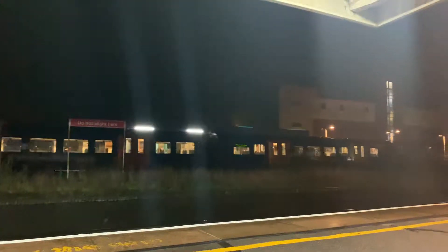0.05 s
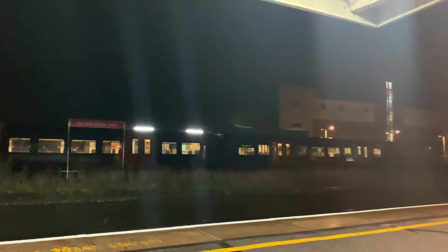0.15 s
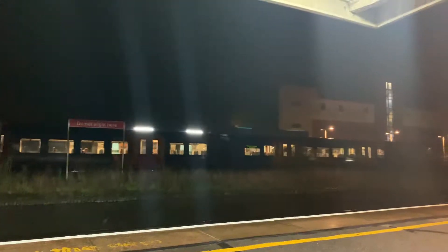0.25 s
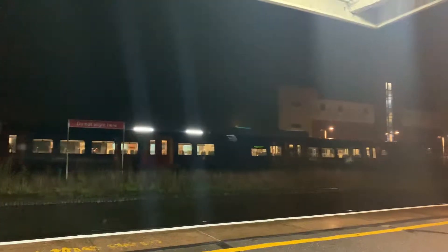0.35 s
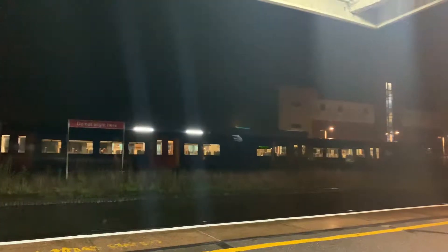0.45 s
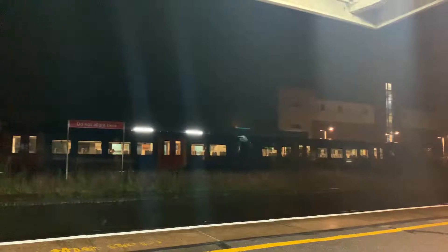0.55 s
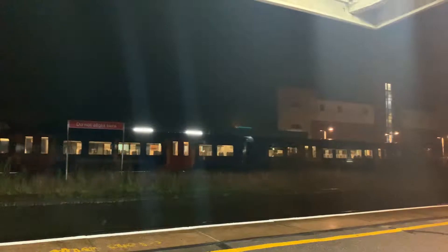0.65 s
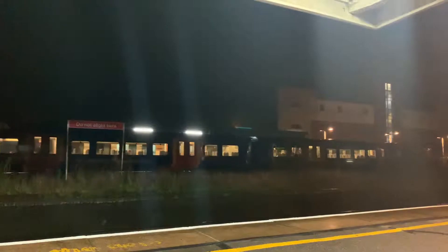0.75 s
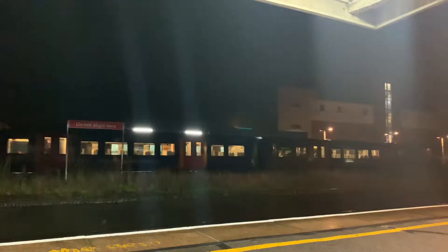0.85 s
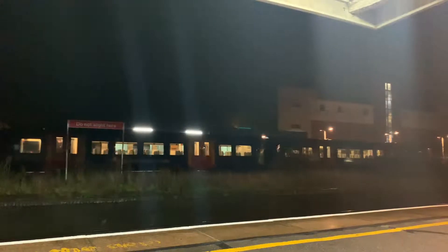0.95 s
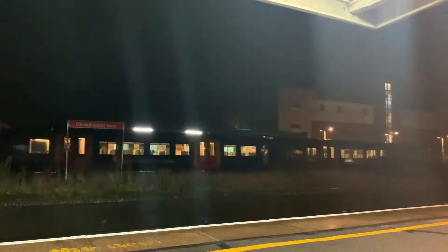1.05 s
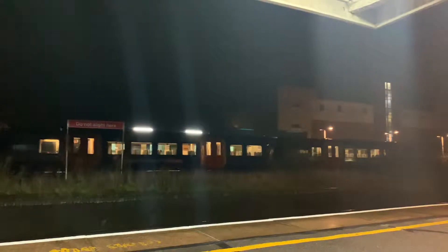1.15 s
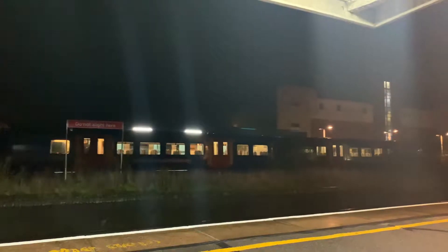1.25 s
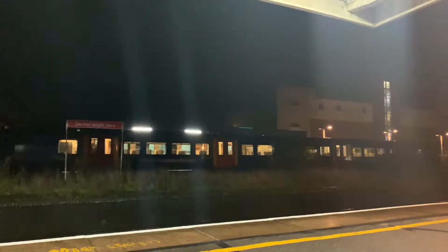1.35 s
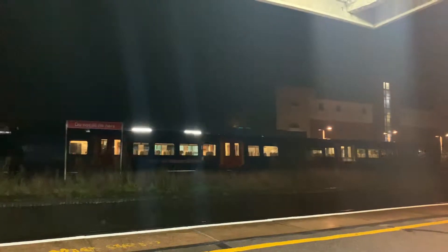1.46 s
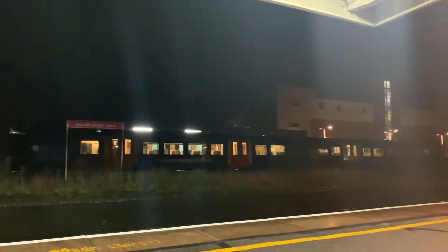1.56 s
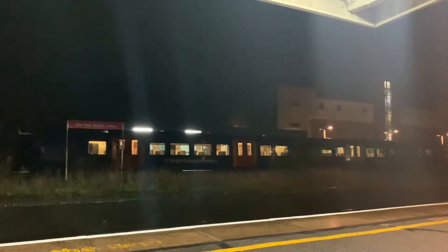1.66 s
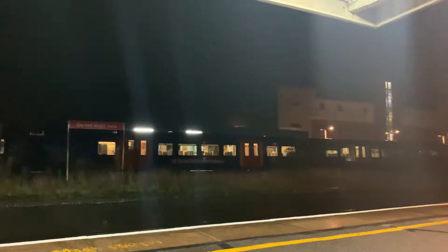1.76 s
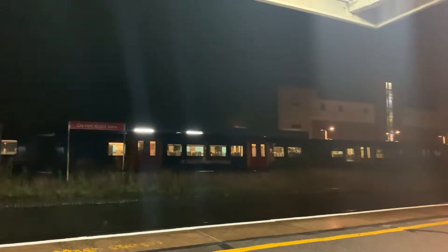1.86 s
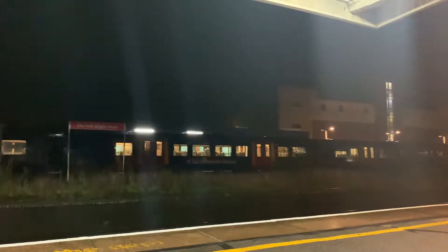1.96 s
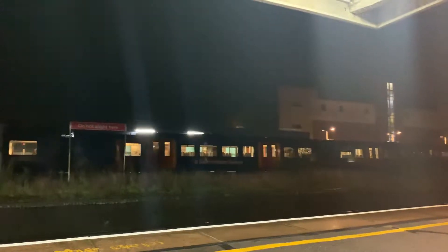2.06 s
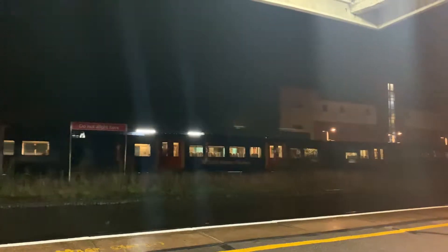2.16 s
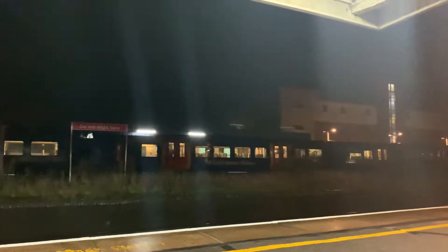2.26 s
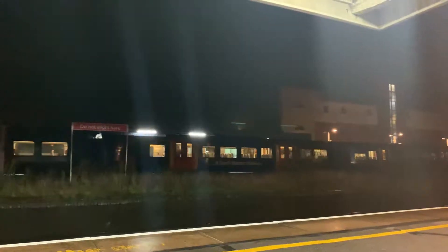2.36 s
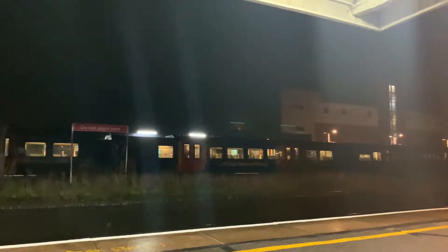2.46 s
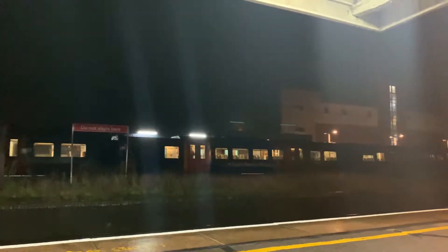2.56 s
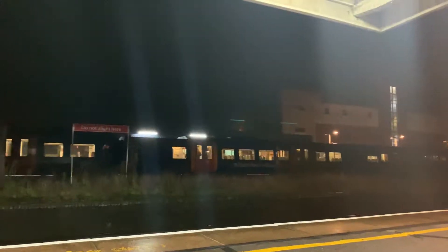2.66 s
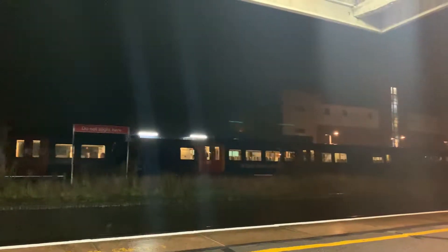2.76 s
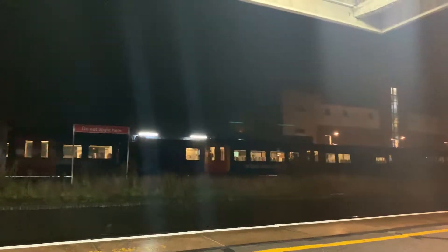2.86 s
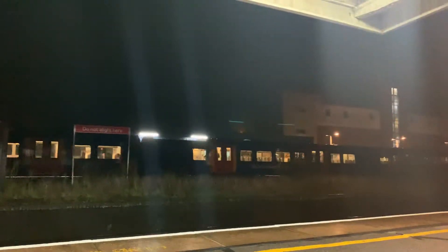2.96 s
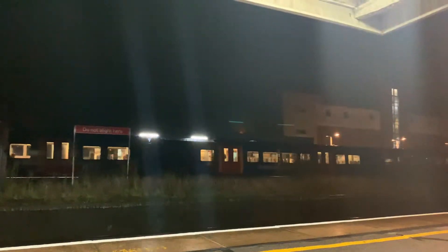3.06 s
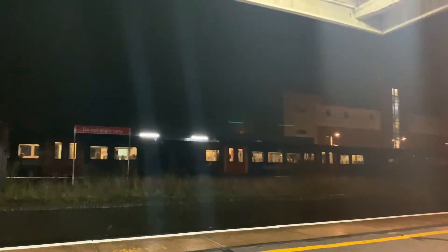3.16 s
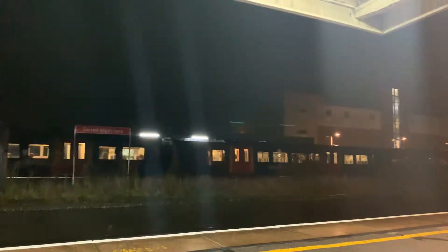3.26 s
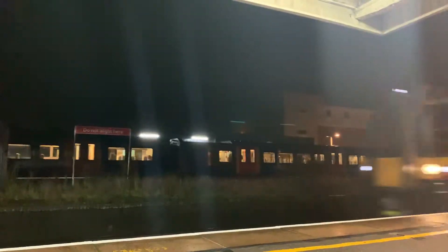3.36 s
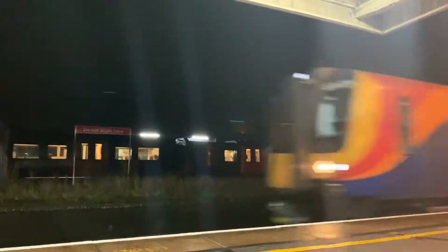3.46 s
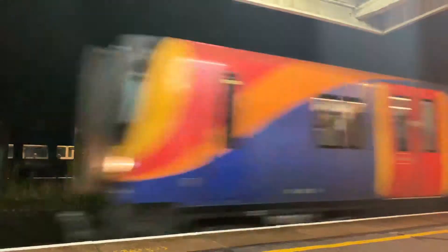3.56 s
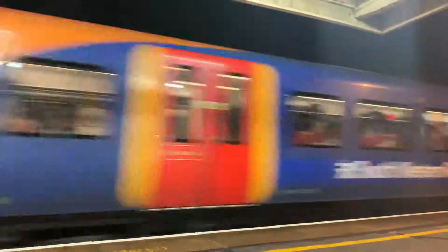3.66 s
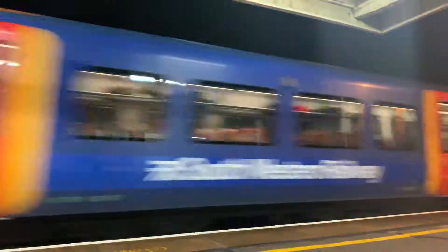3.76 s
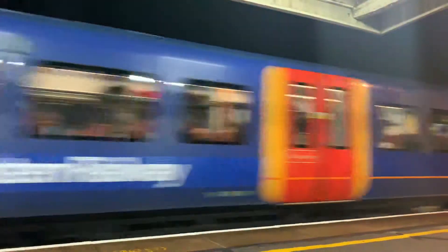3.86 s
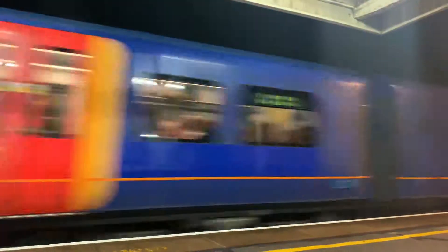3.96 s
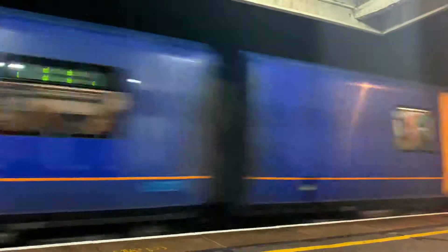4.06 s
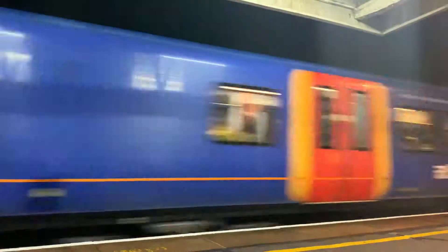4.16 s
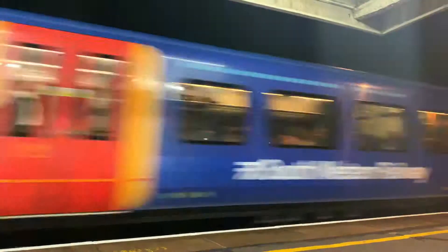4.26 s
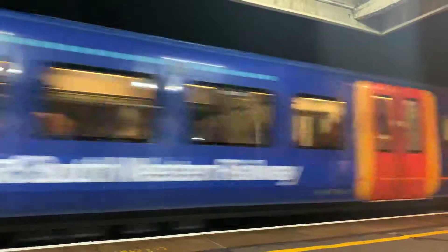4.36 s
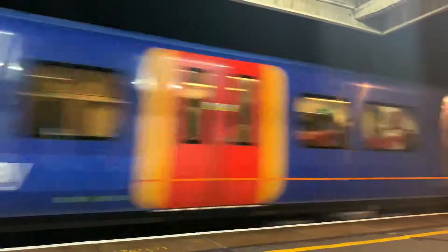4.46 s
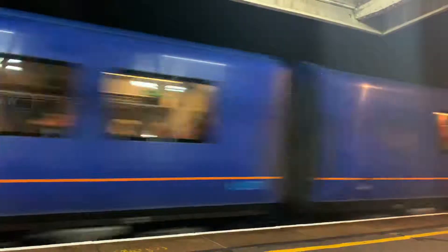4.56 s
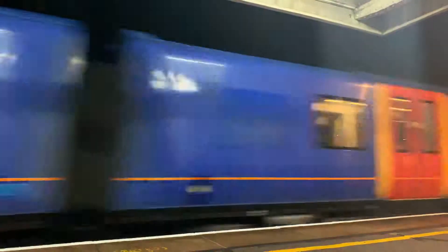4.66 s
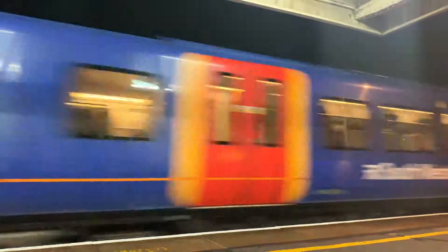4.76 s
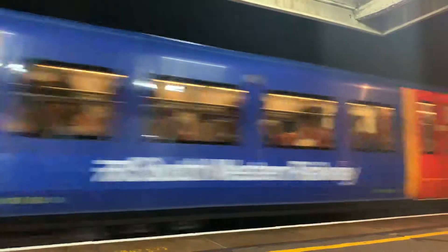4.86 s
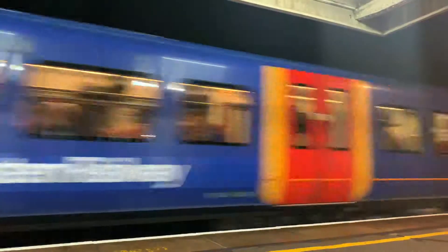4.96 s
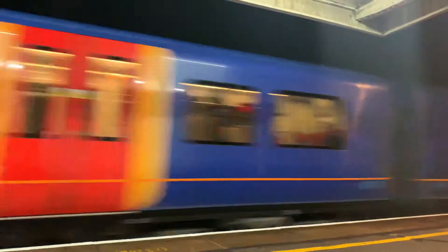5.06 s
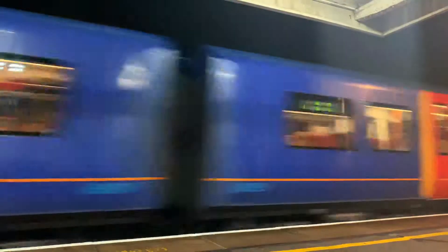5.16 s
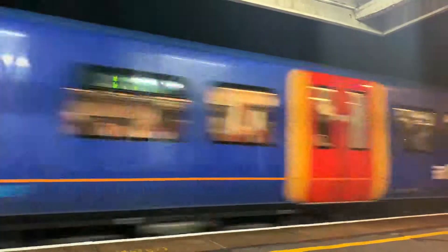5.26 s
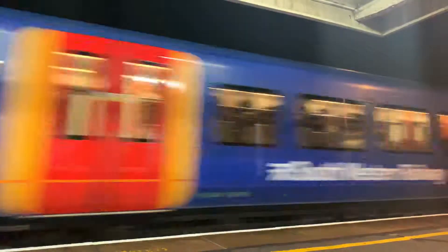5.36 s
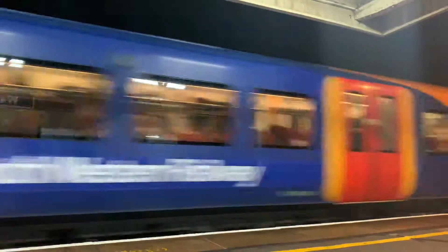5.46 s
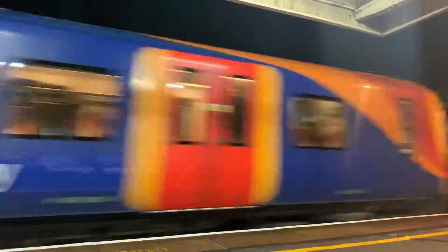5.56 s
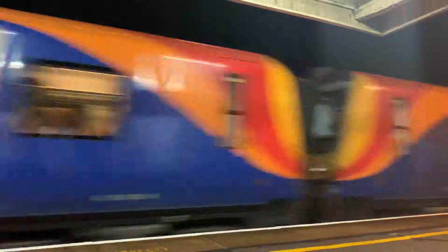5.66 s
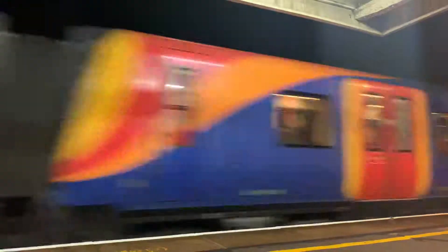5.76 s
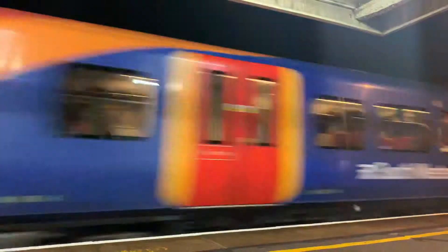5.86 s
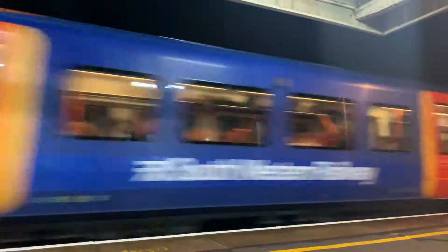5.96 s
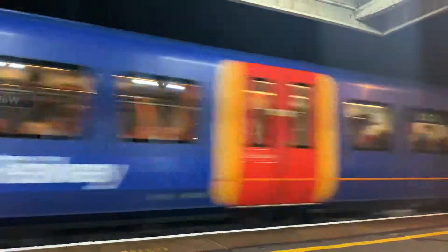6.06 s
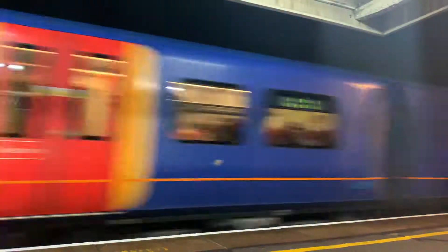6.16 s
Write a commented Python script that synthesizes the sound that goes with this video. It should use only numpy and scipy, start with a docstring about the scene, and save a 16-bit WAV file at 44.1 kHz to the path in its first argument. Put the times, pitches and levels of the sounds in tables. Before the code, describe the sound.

At a roofed station platform, a slow train on a far track hums dully with a thin motor whine. Low rumble and track drone swell as a fast electric train nears. Four wheel clanks in two quick pairs ring over a rail joint with a steely hiss. Then the train bursts past a handheld phone in a loud roar, with ringing wheels, thuds and clacks, still passing at the end.

```python
"""A slow train on a far track hums under everything, with a thin motor whine, from the start to the end.
Over it a fast electric train runs in from the right along a roofed platform: rough wheels shake the ground,
sleepers, rail and wheel discs, made as noise shaped by the track, while low track resonances drone ahead of it.
Four axles then clank over a rail joint, as fading sines; their treble races ahead through the steel as hiss.
Last the train roars past a phone: wheels and rail ring as narrow noise, with short lumps and wavering tones."""
import sys
import numpy as np
from scipy import signal
from scipy.fft import rfft, irfft, next_fast_len
from scipy.io import wavfile
from scipy.ndimage import uniform_filter1d

SR = 44100
rng = np.random.default_rng(int(sys.argv[2]) if len(sys.argv) > 2 else 0)


def output_pcm(signal):
    """Save a mono or channel-first signal as 16-bit PCM at the path in sys.argv[1].

    Samples are clipped to [-1, 1] before scaling.
    """
    pcm = np.clip(np.atleast_2d(signal).T, -1, 1) * 32767
    wavfile.write(sys.argv[1], SR, np.round(pcm).astype(np.int16))


N = 274107
T = np.arange(N) / SR
SIZE = next_fast_len(N)
HZ = np.maximum(np.arange(SIZE // 2 + 1) * SR / SIZE, 1)  # pitch of every frequency bin


def undb(db):
    """Turn decibels into a plain gain."""
    return 10 ** (np.asarray(db) / 20)


def over_hz(table):
    """Read a (Hz, value) table at every frequency bin."""
    hz, value = np.transpose(table)
    return np.interp(np.log(HZ), np.log(hz), value)


def unit(x):
    """Scale to an average power of 1."""
    return x / np.sqrt(np.mean(x ** 2))


def walk(rate):
    """Random levels held for 1 / rate seconds and smoothed twice; their spread is near 1."""
    hold = int(SR / rate)
    steps = np.repeat(rng.standard_normal(N // hold + 1), hold)
    return 0.63 * uniform_filter1d(uniform_filter1d(steps, hold), hold)[:N]


def bell(hz, width_hz):
    """Gain of one resonance: strongest at its own pitch, weaker on both sides."""
    return 1 / np.sqrt(1 + ((HZ - hz ** 2 / HZ) / width_hz) ** 2)


def swell(at, width_s):
    """One smooth hump in time for each moment."""
    return np.exp(-.5 * ((T - np.asarray(at)[:, None]) / width_s) ** 2)


def narrow(hz, width_hz, alike):
    """Stereo noise in one steep resonance; alike sets how much both sides share."""
    noise = rng.standard_normal((3, len(HZ))) + 1j * rng.standard_normal((3, len(HZ)))
    spectrum = (alike * noise[0] + noise[1:]) * bell(hz, width_hz) ** 2
    return unit(irfft(spectrum, SIZE)[:, :N])


def ringing(table, t):
    """One fading sine for each row: pitch in Hz, level in dB, seconds to fade by 60 dB."""
    return np.array([undb(db) * np.exp(-np.log(1000) * t / t60) * np.sin(2 * np.pi * hz * t)
                     for hz, db, t60 in table])


# How far the left microphone lags the right. Each row: time in seconds, lag in ms (minus: left comes first).
BEARING = [(0, 0.25), (3.6, 0.29), (3.95, -0.5), (6.22, -0.46)]
# How much the two microphones hear in common. Each row: pitch in Hz, shared part from 0 to 1.
ALIKE = [(60, 1), (130, 0.94), (290, 0.84), (640, 0.72), (1400, 0.039), (3000, 0.34), (15000, 0.024)]
# Which side is louder. Each row: pitch in Hz, left minus right in dB.
LEAN = [(60, 0), (125, -1.7), (250, 0), (500, 1.7), (2000, .9), (4000, -1.5), (8000, 0)]


def bands(gain, swell_db, flicker_db, order):
    """Stereo noise in order bands an octave, as (centre Hz, sound): each flickers alone, neighbours swell together."""
    alike = np.clip(over_hz(ALIKE), 0, 1)
    lean = undb(np.outer([.5, -.5], over_hz(LEAN)))
    common, *own = (rfft(rng.standard_normal(SIZE)) for _ in range(3))
    mixed = (common * np.sqrt(alike) + own * np.sqrt(1 - alike)) * lean
    lag = np.interp(T, *np.transpose(BEARING)) * SR / 1000  # in samples
    drift = walk(2.9)
    for octave in np.arange(4, 14.1, 1 / order):
        cut = gain * np.cos(np.pi / 2 * np.clip(order * (np.log2(HZ) - octave), -1, 1))
        sound = irfft(mixed * cut, SIZE)[:, :N]
        reach = np.clip(2 ** octave / 1800, .4, 1)  # long waves bend round the phone and arrive closer together
        sound[0] = np.interp(np.arange(N) - reach * lag, np.arange(N), sound[0])
        drift = .8 * drift + .6 * walk(5)
        yield 2 ** octave, undb(swell_db * drift + flicker_db * walk(18)) * sound


# Colour of the far roll. Each row: pitch in Hz, relative level in dB per Hz.
FAR_COLOUR = [(20, -21), (40, 3), (95, -3.5), (130, -12), (220, -16), (450, -13.5), (1000, -15.5),
              (1500, -18.5), (1850, -19), (2300, -22), (3200, -29.5), (5600, -40), (6800, -44), (9000, -75),
              (15000, -57)]
# Rail hums. Each row: pitch in Hz, width in Hz, starting level in dB, growth in dB per second.
FAR_HUM = [(1814, 82, -57, 4.5), (1958, 150, -56.5, 7), (2580, 82, -63, 5), (6640, 300, -72, 7)]
FAR_DB = -37.5  # level of the whole roll
WHINE_HZ, WHINE_DB, WHINE_GROWTH_DB = 1790, -55.5, 4.5  # pitch it wavers around, starting level, growth per second


def far_train():
    """A steady dull roll, with narrow rail hums and a thin motor whine that grow for three seconds and then hold."""
    growing_s = np.minimum(T, 3)
    colour = undb(over_hz(FAR_COLOUR))
    roll = sum(sound for _, sound in bands(colour, swell_db=4.5, flicker_db=0.6, order=1))
    hums = 0
    for hz, width, db, growth_db in FAR_HUM:
        level_db = db + growth_db * growing_s + 0.34 * walk(5.5)
        hums = hums + undb(level_db) * narrow(hz, width, alike=0.24)
    whine = np.sin(2 * np.pi * np.cumsum(WHINE_HZ * (1 + 0.0022 * walk(12))) / SR)
    whine *= undb(WHINE_DB + WHINE_GROWTH_DB * growing_s + 2.3 * walk(7.1))
    return undb(FAR_DB) * unit(roll) + hums + whine


# The pitches in Hz where one part of the roar hands over to the next.
PART_HZ = [75, 140, 420, 1500, 2900, 10000]
# Colour of the rolling noise. Each row: pitch in Hz, relative level in dB per Hz.
ROLLING = [(20, -54), (40, -27.5), (100, -37.5), (175, -34), (270, -32.5), (450, -35), (800, -36.5),
           (1250, -37), (1600, -40.5), (2620, -47.5), (2820, -48.5), (3400, -56.5), (4600, -56),
           (5600, -60.5), (8500, -58.5), (13000, -75.5), (15500, -79.5)]
# Resonances of the track. Each row: pitch in Hz, width in Hz, lift in dB.
TRACK_RING = [(94, 8.3, 2), (239.5, 27, 2), (800, 9.9, -2), (1078, 210, 3.5)]
# The train closing in. Each row: time in seconds, then dB for deep ground, rumble, track noise and rushing air,
# all relative to the basic level alongside.
NEARING = [(0, -35, -25.5, -42.5, -69), (1.2, -28, -21.5, -29, -39), (1.55, -17, -19.5, -20.5, -21),
           (1.9, -16, -17.5, -18, -19), (2.25, -10, -11.5, -18.5, -13), (2.601, -14, -11.5, -15, -9),
           (2.95, -3, -6, -11, -2), (3.3, -1, -0.5, -4, 5.5), (3.57, 4, 0, 1.5, 17)]
# Sets of wheels passing the phone, a pair at each coupling. Each row: time in seconds, wheel ring in dB,
# seconds until the rail answers, rail ring in dB, rumble change in dB, hiss change in dB.
BOGIES = [(3.398, -40, 0.18, -48, -4.5, 0.5), (3.902, -37, 0.16, -33.5, 1.9, 2.5),
          (4.36, -23, 0.27, -31, 2.5, 2.5), (4.93, -28, 0.17, -32, 2, -2.1),
          (5.46, -23.5, 0.18, -27.5, 1.5, 0.3), (5.88, -29, 0.15, -43.5, 4.5, 1.5)]
# One row each for deep ground, ballast, sleepers, rail, wheel discs, hiss and air. Each row: basic level in dB,
# share of the approach, lift at the nose in dB, seconds for that lift to grow, seconds for it to settle,
# share of a coupling's rumble, share of its hiss.
PARTS = [(-26, 0.58, 4.5, 0.21, 0.37, 0.51, 0.032), (-24.5, 0.68, 7.5, 0.44, 0.29, 0.31, 0),
         (-23, 0.99, 9.5, 0.2, 0.26, 1, 0.34), (-16.5, 0.93, 4, 0.19, 0.059, 0.37, 0.1),
         (-22, 1.01, -1.5, .25, 0.9, 0, 0.32), (-26, 0.99, -0.5, .25, 1, 0, 0.44),
         (-44, 0.65, 1.5, .25, 0.27, 0, 0.86)]
NOSE_S = 3.61  # the front draws level
COUPLING_S = 0.28  # half-width of the broad swell


def near_train():
    """Wheel roughness as noise through the track's resonances; each part has its own share of approach and swells."""
    s, deep_db, low_db, track_db, air_db = np.transpose(NEARING)
    approaches = (deep_db, low_db, low_db, track_db, track_db, track_db, air_db)
    at, *_, rumble_db, hiss_db = np.transpose(BOGIES)
    humps = swell(at, COUPLING_S)
    lift_db = sum(db * bell(hz, width) ** 2 for hz, width, db in TRACK_RING)
    colour = undb(over_hz(ROLLING) + lift_db)
    parts = np.zeros((len(PARTS), 2, N))
    for hz, sound in bands(colour, swell_db=0.2, flicker_db=1.0, order=2):
        parts[np.searchsorted(PART_HZ, hz)] += sound
    out = 0
    for part, approach_db, row in zip(parts, approaches, PARTS):
        db, share, nose_db, rise_s, settle_s, low, high = row
        nose = np.exp(np.minimum((T - NOSE_S) / rise_s, (NOSE_S - T) / settle_s))
        level_db = db + share * np.interp(T, s, approach_db) + nose_db * nose
        level_db = level_db + (low * rumble_db + high * hiss_db) @ humps
        out = out + undb(level_db) * unit(part)
    return out


# Low track resonances. Each row: pitch in Hz, width in Hz, level in dB before the rumble's approach is added.
DRONE = [(183, 46, -23), (274, 63, -23.5), (327, 45, -28)]
DRONE_END_S, DRONE_FADE_S = 4.06, 0.098  # when it dies away, and how fast


def drone():
    """The track ahead of the train drones: low resonances grow with the rumble and give way after the front."""
    s, _, low_db, *_ = np.transpose(NEARING)
    size = undb(np.interp(T, s, low_db)) / (1 + np.exp((T - DRONE_END_S) / DRONE_FADE_S))
    return size * sum(undb(db + 2.2 * walk(8.98)) * narrow(hz, width, alike=2.3) for hz, width, db in DRONE)


# Axles crossing the joint. Each row: start in seconds, seconds until the wheel lands, leaving blow in dB relative
# to the landing, then levels in dB for the clank, its treble (relative), the steel hiss before its filter, the grit.
AXLES = [(1.283, 0.016, -6.5, -23, 0.5, -21, -35), (1.397, 0.009, -7, -22.5, -6, -34, -38),
         (1.670, 0.019, -3, -22, -0.5, -25, -36), (1.785, 0.012, -1, -25.5, -4, -27, -37)]
# How the joint rings. Each row: pitch in Hz, relative level in dB, seconds to fade by 60 dB.
JOINT = [(292, -5, 0.18), (480, -9, 0.05), (650, 2, 0.05), (700, 3, 0.045), (780, -1, 0.05),
         (886, -5, 0.04), (1200, -3, 0.04), (1610, -6, 0.015), (2235, -6, 0.06), (2850, -9, 0.04),
         (4040, -10, 0.02), (4600, -11, 0.02), (7040, -14, 0.07), (7800, -13, 0.036)]
TREBLE_HZ, BLOW_S = 2500, .004  # ringing above this follows the treble column; time the ring takes to build
ROOF_DB, ROOF_S, ROOF_LAG_S = -30, 0.045, 0.018  # roof return: level setting, fading time, build-up
GRIT_LEAD_S, GRIT_RISE_S, GRIT_FADE_S = 0.01, 0.0058, 0.064  # head start, build-up, fading time
STEEL_LEAD_S, STEEL_T60_S = 0.022, 0.62  # head start of the hiss, time for it to fade by 60 dB


def band_noise(hz, length):
    """Stereo noise between two pitches."""
    sos = signal.butter(2, hz, "band", fs=SR, output="sos")
    return signal.sosfilt(sos, rng.standard_normal((2, length)))


def joint():
    """Each wheel leaves one rail end and lands on the next; two blows ring the joint and the roof smears them."""
    out, t = np.zeros((2, N)), T[:SR // 2]
    modes = ringing(JOINT, t) * (1 - np.exp(-t / BLOW_S))
    high = np.transpose(JOINT)[0] > TREBLE_HZ
    for at, drop, leave_db, clank_db, treble_db, steel_db, grit_db in AXLES:
        # no two wheels strike alike
        ring = undb(1.0 * rng.standard_normal(len(modes)) + treble_db * high) @ modes
        late = np.maximum(t - drop, 0)
        noise = rng.standard_normal((3, len(t)))
        roof = undb(ROOF_DB) * (1 - np.exp(-t / ROOF_LAG_S)) ** 2 * np.exp(-late / ROOF_S)
        push = roof * (noise[0] + .5 * noise[1:])
        push[:, 0] += undb(leave_db)
        push[:, int(drop * SR)] += 1
        clank = signal.fftconvolve(push, ring[None], axes=1)[:, :len(t)]
        clank *= undb(clank_db) / np.sqrt(np.max(uniform_filter1d(ring ** 2, SR // 50)))
        # loose fittings rattle around each blow, crackling in short random steps
        grit = undb(grit_db) * unit(band_noise([1000, 5350], len(t)))
        grit *= (1 - np.exp(-t / GRIT_RISE_S)) ** 2 * np.exp(-late / GRIT_FADE_S)
        grit *= undb(4 * np.repeat(rng.standard_normal(len(t) // 100 + 1), 100)[:len(t)])
        # sound is far quicker in steel, so the rail beside the platform hisses first
        hiss = undb(steel_db) * band_noise([6300, 9200], len(t))
        hiss *= (1 - np.exp(-t / 0.028)) * np.exp(-np.log(1000) * t / STEEL_T60_S)
        for start, sound in ((at, clank), (at - GRIT_LEAD_S, grit), (at - STEEL_LEAD_S, hiss)):
            i = int(start * SR)
            out[:, i:i + len(t)] += sound
    return out


# Ringing of the rail. Each row: pitch in Hz, width in Hz, relative level in dB.
RAIL_RING = [(561, 47, -2), (626, 95, -1), (780, 150, -7)]
# Ringing of the wheel discs. Each row: pitch in Hz, width in Hz, relative level in dB.
WHEEL_RING = [(1847, 140, -8.5), (2173, 100, -4.5), (2324, 130, -4.5), (2462, 130, -6.5)]
BOGIE_S, RING_WANDER_DB = 0.12, 1.6  # half-width of each swell; random wander of each resonance
RAIL_BETWEEN_DB, WHEEL_BETWEEN_DB = -24, -34  # ring that stays between sets of wheels


def bogies():
    """Wheel discs ring up as each set of wheels draws level, the rail a little after; each resonance wanders alone."""
    at, wheel_db, lag, rail_db, *_ = np.transpose(BOGIES)
    arrive = np.clip((T - NOSE_S) / 0.44 + 1, 0, 1) ** 2
    lean = undb([[.7], [-.7]])  # the wheels pass nearer the left microphone
    rail = (at + lag, rail_db, RAIL_BETWEEN_DB, RAIL_RING)
    wheel = (at, wheel_db, WHEEL_BETWEEN_DB, WHEEL_RING)
    out = 0
    for s, db, between_db, rings in (rail, wheel):
        size = arrive * undb(between_db) + undb(db) @ swell(s, BOGIE_S)
        for hz, width, ring_db in rings:
            wander = undb(ring_db + RING_WANDER_DB * walk(16))
            out = out + lean * size * wander * narrow(hz, width, alike=1.0)
    return out


# Short lumps in the roar. Each row: start in seconds, pitch of the thud in Hz, peak of the thud in dB,
# peak of the clack in dB.
LUMPS = [(3.405, 190, -12, -22), (3.505, 270, -7, -20), (3.572, 250, -16, -13), (3.605, 76, -12, -22),
         (3.648, 300, -8, -14), (3.70, 187, -8, -20), (3.79, 87, -7, -22), (3.81, 200, -10, -20),
         (3.978, 255, -9, -13), (4.28, 244, -8, -16), (4.285, 88, -14, -22), (4.598, 300, -17, -11),
         (4.69, 230, -14, -9), (4.722, 229, -10, -20), (4.83, 295, -10, -19), (5.055, 250, -18, -8),
         (5.134, 395, -9, -13), (5.50, 91, -12, -20), (5.57, 250, -17, -11), (5.629, 300, -15, -6),
         (5.692, 280, -14, -7), (5.80, 299, -10, -18), (6.04, 90, -15, -10), (6.155, 278, -12, -18)]
# What a clack is made of. Each row: pitch in Hz, relative level in dB, seconds to fade by 60 dB.
CLACK = [(590, 2, 0.09), (650, 1, 0.06), (780, -8, .04), (1080, -3, .03), (2200, -12, .012)]
LUMP_S, THUD_CYCLES = 0.004, 22  # time a lump takes to build; cycles a thud lasts while fading by 60 dB


def lumps():
    """Short lumps in the roar: low thuds and brighter clacks, made as fading sines, that stand out at random."""
    out, t = np.zeros((2, N + SR)), T[:SR // 4]
    rise = (1 - np.exp(-t / LUMP_S)) ** 2
    for at, hz, thud_db, clack_db in LUMPS:
        thud = rise * ringing([(hz, 0, THUD_CYCLES / hz)], t)[0]
        clack = rise * (undb(2 * rng.standard_normal((2, len(CLACK)))) @ ringing(CLACK, t))
        i = int(at * SR)
        out[:, i:i + len(t)] += undb(thud_db) * thud / np.max(np.abs(thud))
        out[:, i:i + len(t)] += undb(clack_db) * clack / np.max(np.abs(clack))
    return out[:, :N]


# Brief tones in the ringing. Each row: middle in seconds, pitch in Hz, level in dB.
TONES = [(3.898, 2207, -19), (4.309, 2314, -19), (4.42, 2170, -20), (4.746, 1750, -22), (5.042, 2230, -23),
         (5.516, 2207, -20), (5.87, 2475, -21)]
TONE_S, TONE_WAVER_HZ = .02, 60  # half-length; size of the random waver in pitch


def wavering_tones():
    """Brief narrow tones in the ringing: sines wavering in pitch at random."""
    out = np.zeros((2, N))
    sizes = swell(np.transpose(TONES)[0], TONE_S)
    for (at, hz, db), size in zip(TONES, sizes):
        near = slice(int((at - .1) * SR), int((at + .1) * SR))
        waver = TONE_WAVER_HZ * walk(40)[near]
        phase = 2 * np.pi * np.cumsum(hz + waver) / SR + rng.uniform(0, 1.7, (2, 1))
        out[:, near] += undb(db) * size[near] * np.sin(phase)
    return out


PATCH_DB, PATCH_FROM_HZ = 3.2, 600  # full graininess; it sets in from half this pitch


def patchy(x):
    """Make the roll grainy: small patches of time and pitch in the upper spectrum get their own random gain."""
    hz, _, cells = signal.stft(x, SR, nperseg=1024, boundary="even")
    chance = uniform_filter1d(rng.standard_normal(cells.shape[1:]), size=5, axis=1)
    depth_db = PATCH_DB * np.clip(hz / PATCH_FROM_HZ - .5, 0, 1)[:, None]
    steady_db = depth_db ** 2 * np.log(10) / 20  # taken off so that the average power stays the same
    grainy = cells * undb(depth_db * unit(chance) - steady_db)
    return signal.istft(grainy, SR, nperseg=1024)[1][:, :N]


def scene():
    """Both trains with all their noises, added together."""
    roar = patchy(near_train() + bogies())
    return far_train() + roar + drone() + joint() + lumps() + wavering_tones()


# Across the treble left and right are by turns alike and opposed.
# Colour of left plus right. Each row: pitch in Hz, gain in dB.
SUM = [(8800, 0.5), (9550, -5.5), (9750, -25), (10000, -85), (10350, -84), (11000, -24), (11600, -3.5),
       (11800, 4), (15100, 6.5), (15250, -9)]
# Colour of left minus right. Each row: pitch in Hz, gain in dB.
DIFFERENCE = [(5800, 0.5), (7000, -1.5), (7500, -34), (8000, -20), (8500, -2.5), (12300, 6), (12500, -16),
              (13000, -16), (13150, -59), (14400, -55), (14600, -14), (15200, 4)]
TOP_HZ = 15750  # everything above is cut


def record(dry):
    """Peaks are rounded, sum and difference of the channels get their own colour, the top is cut."""
    loud = np.tanh(1.05 * dry) / 1.05
    total = irfft(rfft(loud[0] + loud[1], SIZE) * undb(over_hz(SUM)), SIZE)[:N]
    difference = irfft(rfft(loud[0] - loud[1], SIZE) * undb(over_hz(DIFFERENCE)), SIZE)[:N]
    both = np.array([total + difference, total - difference]) / 2
    return signal.sosfilt(signal.ellip(12, .2, 75, TOP_HZ, fs=SR, output="sos"), both)


dry = scene()
out = record(dry)
output_pcm(out)
```